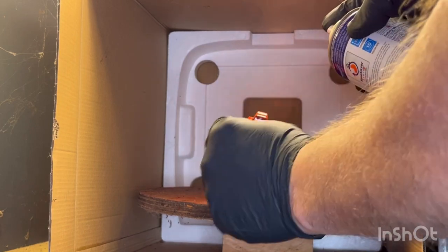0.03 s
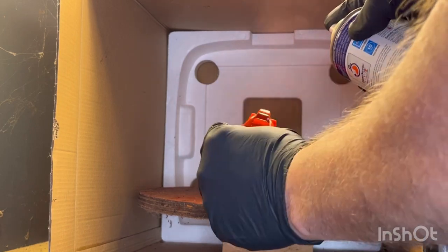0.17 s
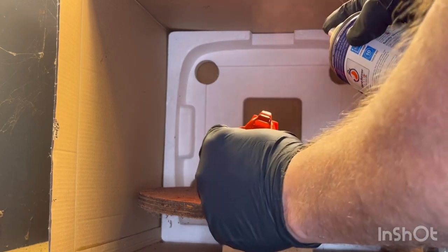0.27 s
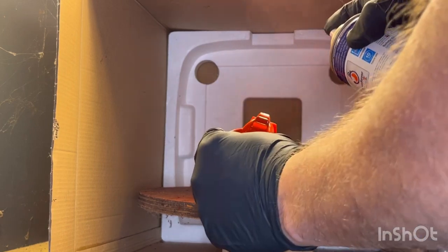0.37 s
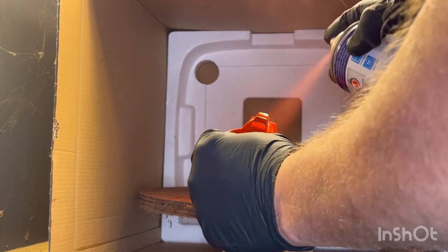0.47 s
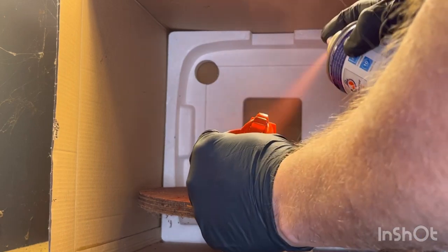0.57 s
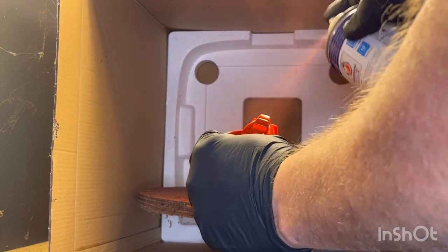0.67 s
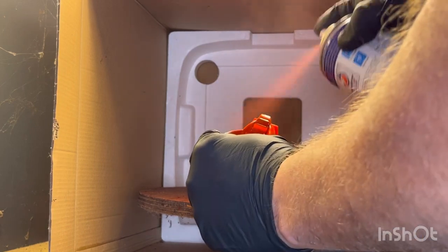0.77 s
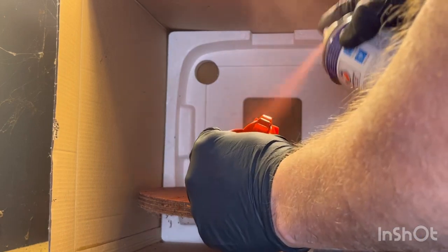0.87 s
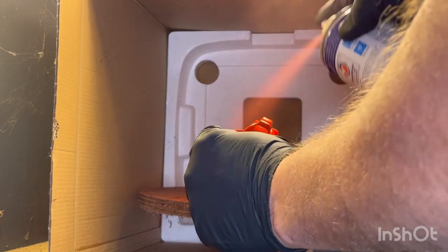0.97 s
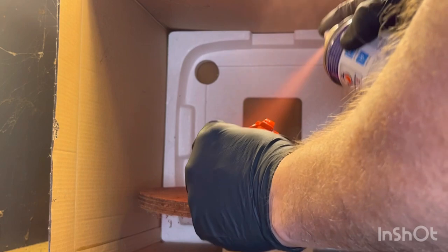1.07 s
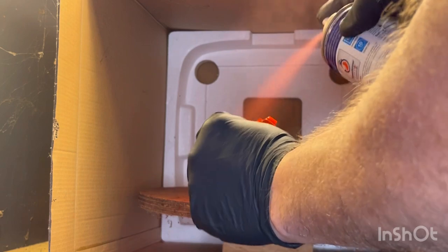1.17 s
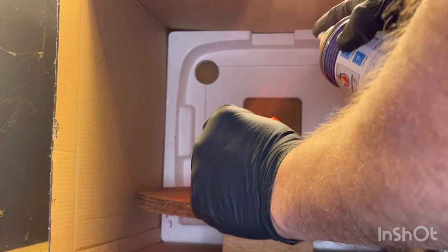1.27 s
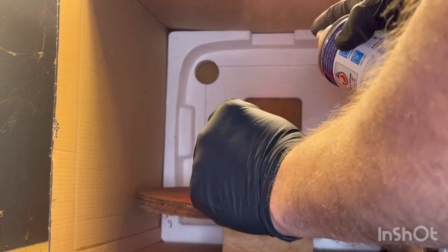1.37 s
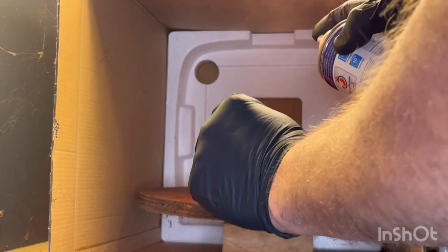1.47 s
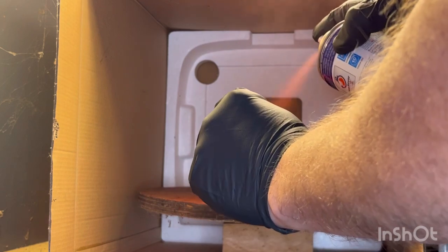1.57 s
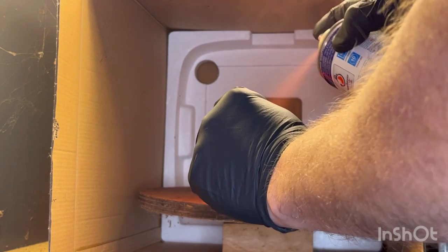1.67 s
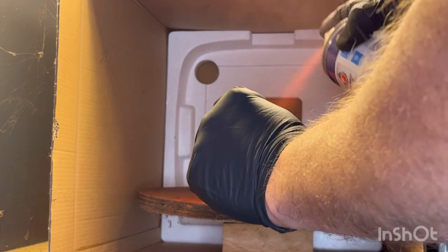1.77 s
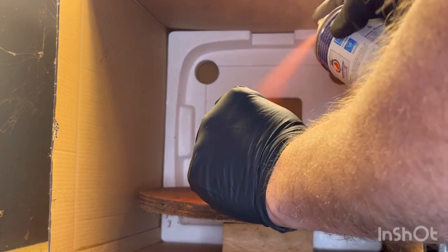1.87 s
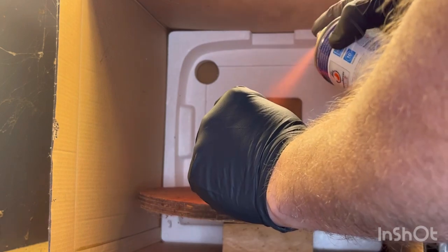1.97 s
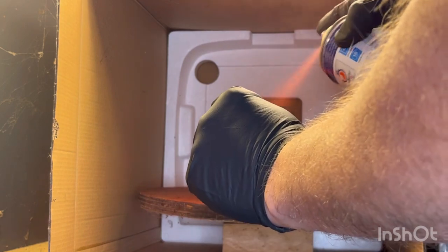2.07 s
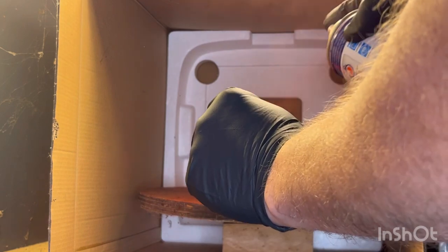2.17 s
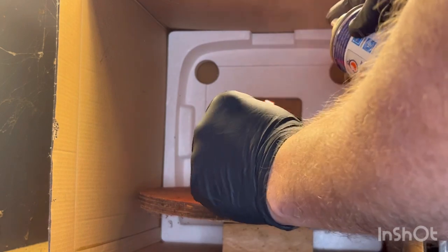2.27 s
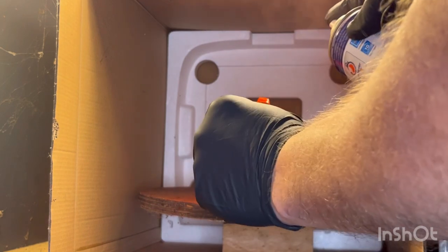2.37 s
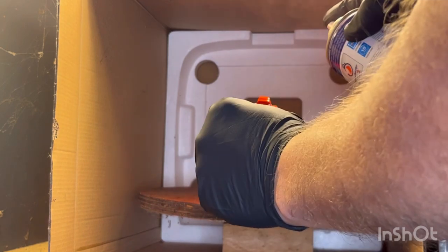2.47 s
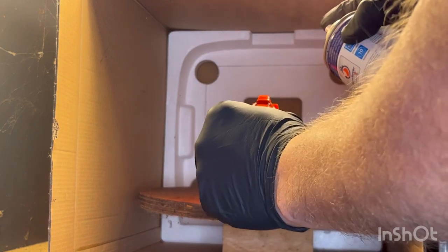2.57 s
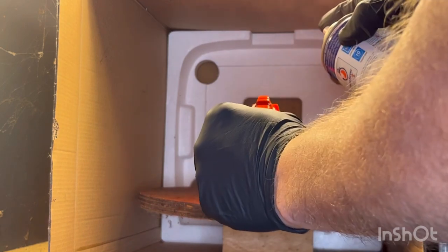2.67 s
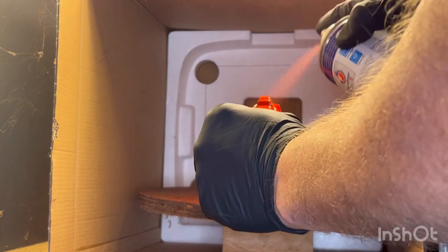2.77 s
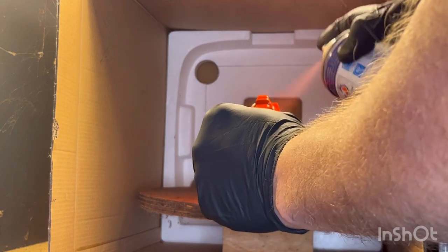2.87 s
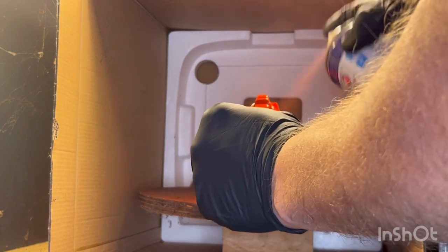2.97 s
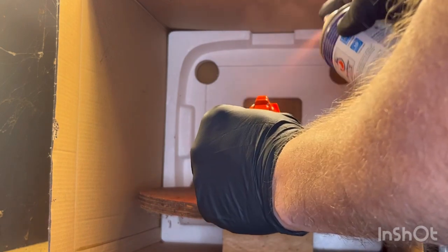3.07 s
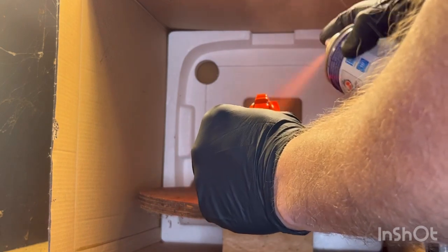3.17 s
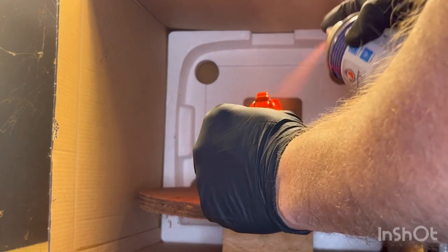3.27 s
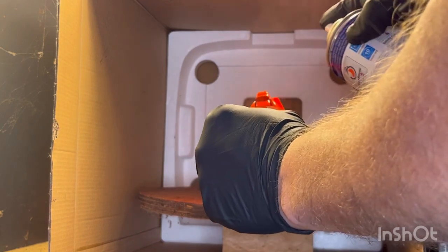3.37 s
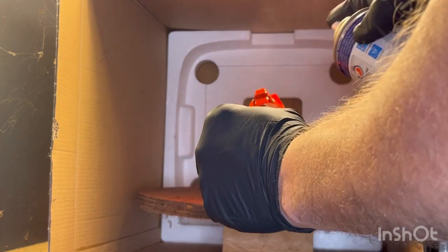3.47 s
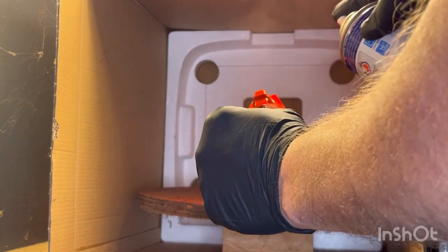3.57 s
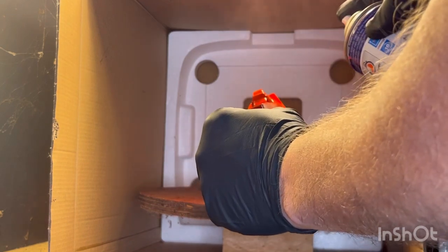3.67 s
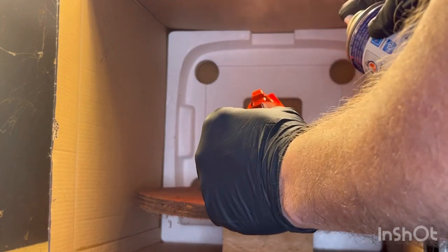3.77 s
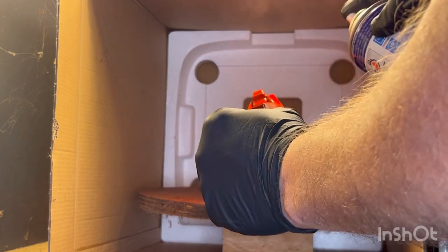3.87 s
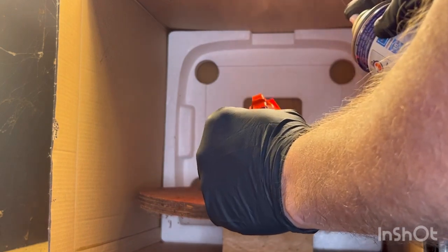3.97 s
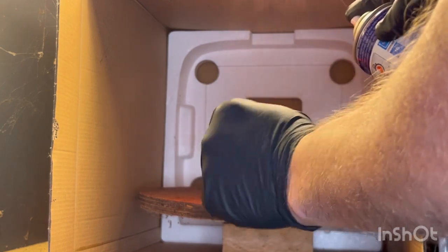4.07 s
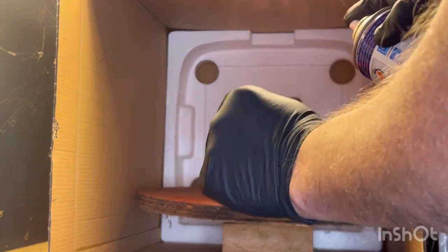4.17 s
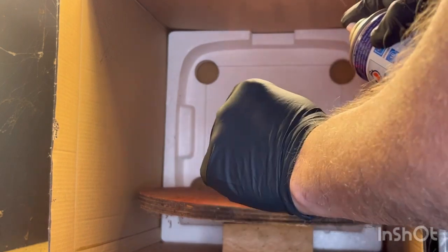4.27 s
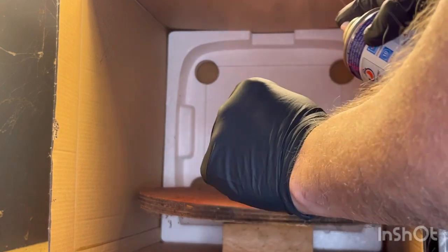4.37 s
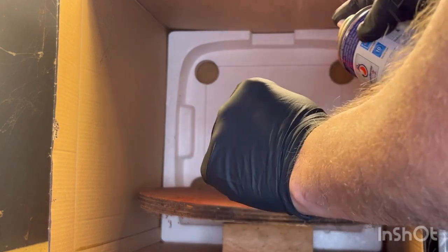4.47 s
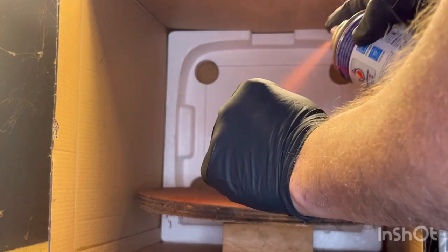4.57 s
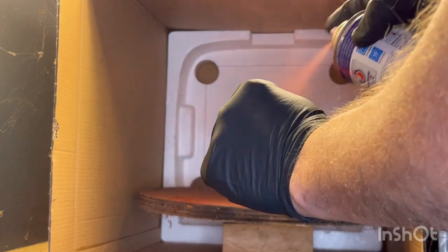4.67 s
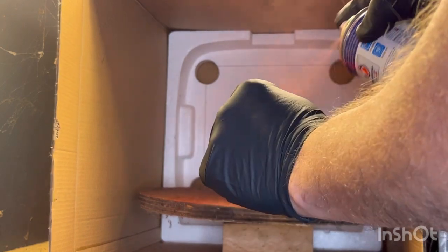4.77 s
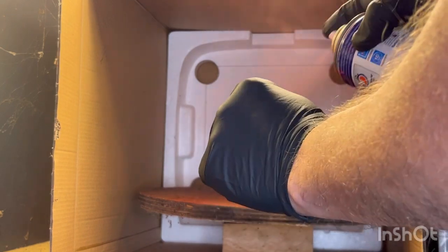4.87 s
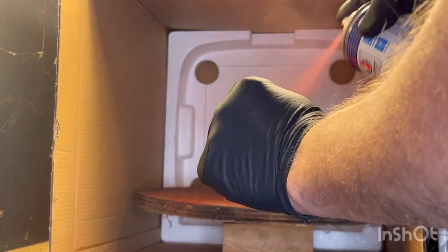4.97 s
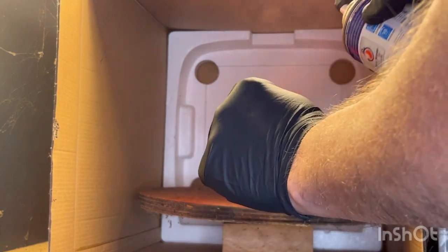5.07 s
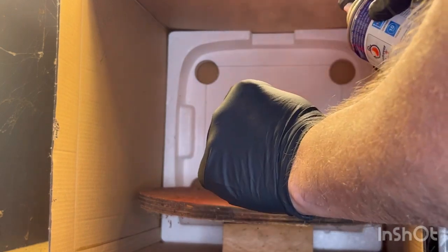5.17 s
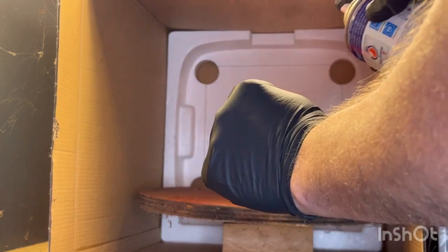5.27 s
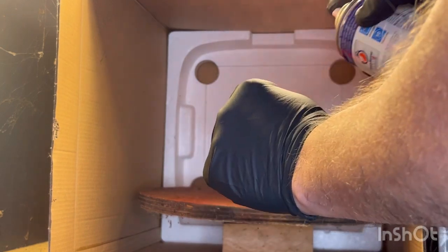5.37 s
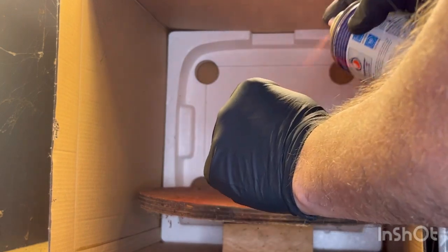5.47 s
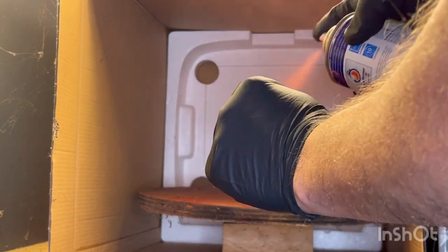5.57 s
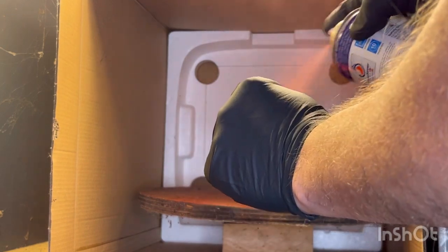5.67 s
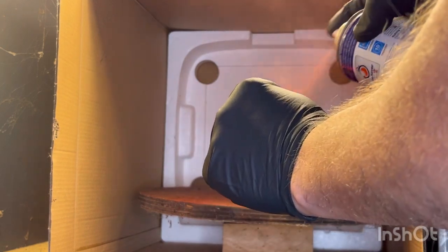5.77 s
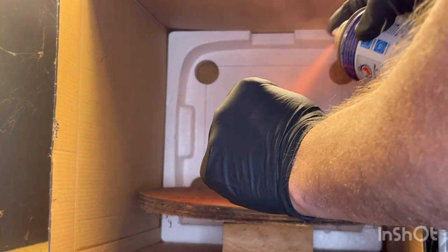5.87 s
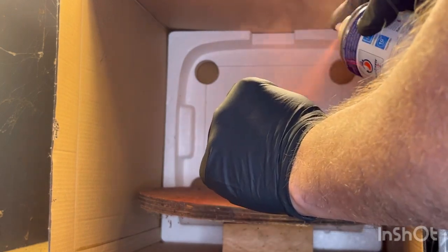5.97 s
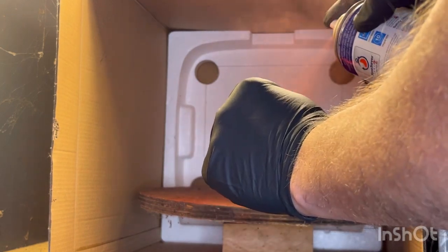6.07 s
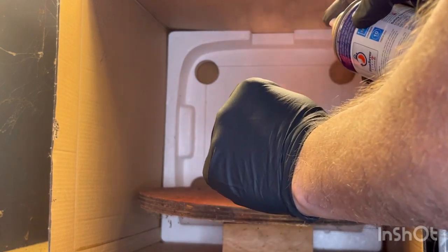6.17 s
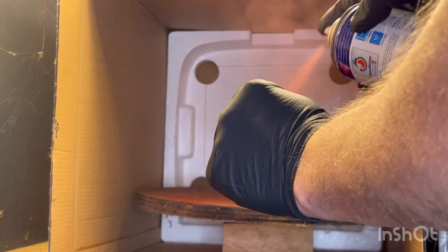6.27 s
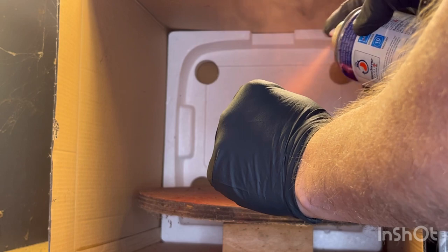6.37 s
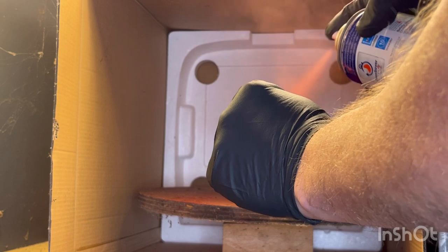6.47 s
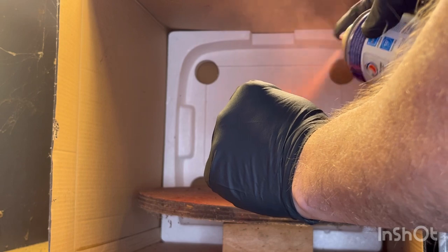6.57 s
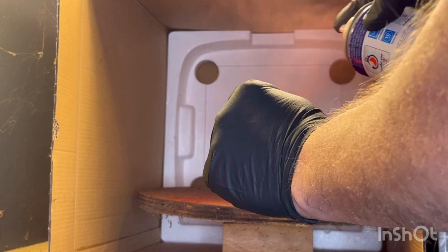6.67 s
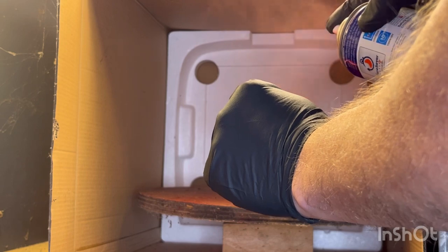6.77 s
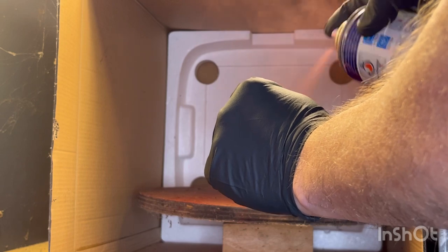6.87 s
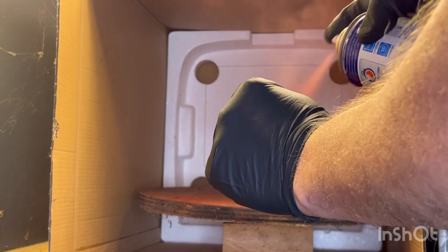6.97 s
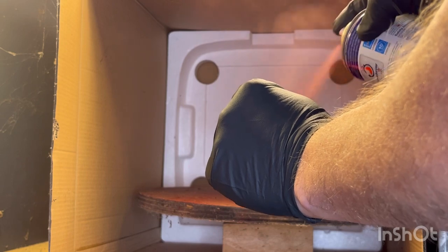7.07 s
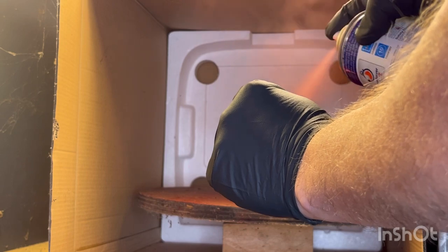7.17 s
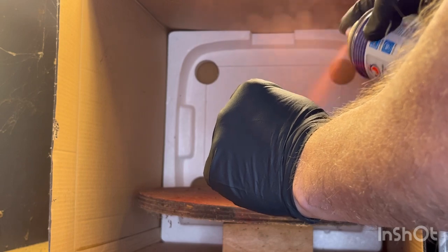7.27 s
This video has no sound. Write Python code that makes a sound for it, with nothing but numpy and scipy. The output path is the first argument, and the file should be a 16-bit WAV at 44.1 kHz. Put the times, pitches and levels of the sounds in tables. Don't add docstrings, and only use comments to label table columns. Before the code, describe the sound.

Quiet low fan rumble with a barely audible thin motor whine opens the scene. From 0.4 s a close aerosol jet fires crisp bursts of roughly a tenth to a third of a second, nearly running together until about 1.25 s. Three more puffs come between 1.5 and 2.1 s, then a pause with a very faint glove swish. Sprays return at 2.8 and 3.1-3.3 s, followed by a longer lull with a short, soft rubber rustle at 3.8 s. A fading burst starts at 4.5 s; around 4.8 s a soft low table bump and a sharp triple metallic ball clack precede a tiny puff at 4.9 s. After another gap, bursts resume from 5.5 s to the end, with clacks near 5.85, a faint one at 6.0, then 6.5, 6.9 and 7.2 s. The hiss is bright, fluttering and lightly boxy, with a short dull room tail.

```python
import sys
import numpy as np
from scipy import signal
from scipy.fft import rfft, irfft
from scipy.io import wavfile
from scipy.ndimage import uniform_filter1d, map_coordinates

SR = 44100
rng = np.random.default_rng(int(sys.argv[2]) if len(sys.argv) > 2 else 0)


def wav_record(signal):
    frames = np.transpose(np.atleast_2d(signal))
    bounded = np.clip(frames, -1, 1)
    quanta = np.round(bounded * 32767).astype(np.int16)
    wavfile.write(sys.argv[1], SR, quanta)


def voltage_ratio(decibels):
    exponent = np.asarray(decibels, float) / 20
    return 10 ** exponent


N = 323246
T = np.arange(N) / SR
HZ = np.fft.rfftfreq(N, 1 / SR)


def along(table, column=1):
    table = np.array(table, float)
    return np.interp(np.log(HZ + 1), np.log(table[:, 0]), table[:, column])


def noise(shape, boost_db=0):
    white = rng.standard_normal((2, N))
    coloured = irfft(rfft(white) * voltage_ratio(along(shape) + boost_db), N)
    return coloured / np.sqrt(np.mean(coloured ** 2))


def walk(rate):
    hold = int(SR / rate)
    steps = np.repeat(rng.standard_normal(N // hold + 1), hold)
    return 1.3 * uniform_filter1d(uniform_filter1d(steps, hold), hold)[:N]


def ring(modes, length_s, detune=0):
    t = np.arange(int(length_s * SR)) / SR
    hz, db, t60 = np.array(modes, float).T[:, :, None]
    decay = np.exp(-np.log(1000) * t / t60)
    return voltage_ratio(db) * np.sin(2 * np.pi * hz * (1 + detune) * t) * decay


def add(out, s, sound):
    i = int(s * SR)
    out[..., i:i + sound.shape[-1]] += sound[..., :N - i]


def spray():
    # f/Hz, level/dB per Hz
    hiss_colour = [(5500, -37.5), (7500, -13.5), (9000, -6), (10500, -5.5), (12500, -5.5), (14000, -7.5),
                   (15000, -12.5), (16000, -8)]
    throat_colour = [(500, -12.5), (900, -11.5), (1500, -11), (2100, -7), (3000, -4.5), (4100, 3),
                     (5500, 2), (7000, -1), (8500, 2), (11000, -23)]
    draught_colour = [(60, -14.5), (130, -3.5), (300, -4.5), (600, -12), (1200, -14)]
    # f/Hz, width/Hz, boost/dB
    box_waves = [(1715, 90, 4), (1990, 60, 4.5), (2162, 75, 7.5), (2400, 270, 5.5), (3087, 54, 8.5),
                 (3995, 56, 2.5), (4370, 69, 3), (5270, 80, -3.5), (7463, 46, 12.5), (10000, 120, 3),
                 (11000, 86, 3), (10700, 55, -10.5), (11120, 87, 2), (12060, 100, -9.5), (12250, 80, 3.5),
                 (12900, 120, 3)]
    box_db = sum(db / (1 + (2 * (HZ - hz) / width) ** 2) for hz, width, db in box_waves)

    flow_db, draught_db = valve()
    throat_db = -51 + 0.5 * (flow_db + 43) + 0.4 * np.minimum(flow_db + 74, 0)
    levels = voltage_ratio([flow_db, throat_db, flow_db + draught_db])
    hiss_gain, throat_gain, draught_gain = uniform_filter1d(levels, size=160)
    lag_s = 0.045
    lag = np.exp(-1 / (lag_s * SR))
    draught_gain = signal.lfilter([1 - lag], [1, -lag], draught_gain)

    hiss_flutter = voltage_ratio(3.5 + 0.8 * walk(25) + 1.0 * walk(60) + 0.83 * walk(900))
    hiss = hiss_gain * hiss_flutter * noise(hiss_colour, box_db)
    throat = throat_gain * voltage_ratio(3.0 + 1.0 * walk(40)) * noise(throat_colour, box_db)
    draught = draught_gain * voltage_ratio(5.5 + 2.0 * walk(15)) * noise(draught_colour)
    return patchy(hiss + throat) + draught


def valve():
    # t/s, length/s, hiss level/dB, sag by the end/dB, draught against hiss/dB
    presses = [(0.406, 0.3, -42.5, 10.5, -19), (0.743, 0.28, -44, -1, -19), (0.862, 0.057, -48, 12, -36),
               (0.943, 0.22, -44.5, 3.5, -24.5), (1.136, 0.12, -43, 4.5, -12.5),
               (1.522, .23, -46.5, 2, -10.5), (1.76, 0.21, -43, 7.5, -14), (1.948, 0.17, -43, 4, -16),
               (2.764, 0.28, -46, 10, -14.5), (3.081, 0.17, -44, 2, -14), (3.255, 0.06, -44.5, -2, -8),
               (4.504, 0.38, -43.5, 20, -12.5), (4.924, 0.084, -43, 9.5, -14),
               (5.487, 0.3, -43, 11.5, -19.5), (5.785, 0.33, -41.5, 13, -17.5),
               (6.221, 0.033, -58.5, -8.5, -7.5), (6.254, .15, -45.5, -4.5, -21.5),
               (6.391, 0.26, -42.5, 5.5, -18.5), (6.878, .22, -44, 2.5, -20), (7.094, 0.25, -42, 7, -16.5)]
    leak_s, leak_db, leak_fade_db = 0.024, -58, -4
    open_s, open_from_db, sag_power = 0.014, -5, 2.6
    shut_db_per_s, dregs_db, dregs_db_per_s = 900, -13, 330

    s, length, db, sag_db, draught_db = np.array(presses, float).T[:, :, None]
    t = T[None] - s
    late = np.maximum(t - length, 0)
    opening = open_from_db * (1 - t / open_s).clip(0, 1)
    sag = sag_db * (t / length).clip(0, 1) ** sag_power
    shut = np.minimum(shut_db_per_s * late, dregs_db_per_s * late - dregs_db)
    flow = db + opening - sag - shut
    leak = np.where(t > -leak_s, leak_db + leak_fade_db * (1 + t / leak_s), -160)
    flow = np.where(t > 0, flow, leak)
    return flow.max(0), draught_db[flow.argmax(0), 0]


def patchy(jet):
    patch_hz, patch_per_s, patch_db = 151.3, 14, 3
    hz, s, bins = signal.stft(jet, SR, nperseg=512)
    patches = rng.standard_normal((int(SR / 2 / 60), int(N / SR * 40)))
    at = np.meshgrid(hz / patch_hz, s * patch_per_s, indexing="ij")
    swell = voltage_ratio(patch_db * map_coordinates(patches, at, order=1))
    return signal.istft(bins * swell, SR, nperseg=512)[1][:, :N]


def ball():
    # t/s, peak level/dB, rolling level/dB
    clacks = [(4.8482, -22, -12), (4.8674, -33.5, -13), (4.8843, -35, -16), (5.8288, -23, -19.5),
              (5.8606, -32, -12), (5.8776, -36.5, -18.5), (5.9788, -42.5, -20.5), (6.5028, -34, -13.5),
              (6.912, -29, -10.5), (7.1654, -25, -7.5), (7.1927, -34.5, -13.5), (7.2092, -36, 0),
              (7.2646, -64, -22)]
    # f/Hz, level/dB, t60/s
    can_modes = np.array([(860, -40, 0.046), (1373, -13.5, 0.15), (1963, -5, 0.028), (2043, -7, 0.032),
                          (2850, -8, 0.016), (3630, -7.5, 0.022), (4005, 5, 0.022), (4240, 1.5, 0.035),
                          (5460, -17.5, .02), (8920, 6, .015), (12000, -12.5, .01)])
    held = can_modes * [1, 1, 0.6]
    dull = voltage_ratio(-2.07 * np.log2(can_modes[:, :1] / 4000).clip(0))
    crack_s, crack_db, roll_s = 0.00037, 3.5, 0.028
    contact_band = signal.butter(1, [2500, 9000], "band", fs=SR)
    low_cut = signal.butter(2, 1000, "high", fs=SR)

    out = np.zeros((2, N))
    for s, db, roll_db in clacks:
        detune, uneven_db = rng.standard_normal((2, len(can_modes), 1)) * [[[0.012]], [[2.0]]]
        modes = ring(held, 0.36, detune) * voltage_ratio(uneven_db) * dull
        t = np.arange(modes.shape[1]) / SR
        contact = signal.lfilter(*contact_band, rng.standard_normal(len(t)))
        crack = voltage_ratio(crack_db) * np.exp(-t / crack_s) * contact
        chatter = np.exp(-t / roll_s) * voltage_ratio(4.6 * rng.standard_normal(len(t)))
        push = voltage_ratio(roll_db - 11.5) * rng.standard_normal((2, len(t))) * chatter
        push[:, :int(0.0035 * SR)] *= voltage_ratio(11.0)
        push[:, 0] = 1
        clack = signal.fftconvolve(push, (modes.sum(0) + crack)[None], axes=1)
        clack = signal.lfilter(*low_cut, clack)
        add(out, s, voltage_ratio(db + 3.0) * clack / np.abs(clack).max())
    return out


def glove():
    # t/s, spread/s, level/dB
    rustles = [
        (2.568, .05, -91),
        (3.80, 0.032, -84),
        (5.15, .04, -91),
    ]
    swell = sum(voltage_ratio(db) * np.exp(-0.5 * ((T - s) / spread) ** 2) for s, spread, db in rustles)
    rubber = noise([(9000, -45.0), (10500, -5), (12000, 4.5), (13800, 0), (14500, -28.5)])
    return swell * voltage_ratio(2.0 * walk(87)) * rubber


def table_bump():
    # f/Hz, level/dB, t60/s
    table_modes = [(56.4, -33, 0.71), (153, -38, 0.16), (298, -36.5, 0.082), (450, -50, .04)]
    push_s = 0.01
    boom = ring(table_modes, 0.5).sum(0)
    t = np.arange(len(boom)) / SR
    out = np.zeros((2, N))
    add(out, 4.765, boom * (1 - np.exp(-t / push_s)))
    return out


def workshop():
    # f/Hz, level/dB per Hz
    rumble_colour = [(12, -45.5), (20, -21.5), (34, -14), (59, -2.5), (111, -13), (186, -27), (210, -22.5),
                     (256, -30), (296, -26.5), (534, -40), (810, -36), (938, -45), (3980, -52), (7000, -60),
                     (9100, -85), (15400, -120)]
    air_colour = [(6000, -18.5), (8000, -16.5), (12500, -15), (13500, -31)]
    rumble = voltage_ratio(-58.5 + 1.2 * walk(3)) * noise(rumble_colour)
    air = voltage_ratio(-91) * noise(air_colour)
    whine_hz = 801 + 2.1 * walk(16)
    whine = voltage_ratio(-84 + 2.0 * walk(16)) * np.sin(2 * np.pi * np.cumsum(whine_hz) / SR)
    return rumble + air + whine


def room(near):
    t60_s, level_db, top_hz = 0.16, -18, 4500
    t = np.arange(int(0.5 * SR)) / SR
    decay = np.exp(-np.log(1000) * t / t60_s) * (t > 0.004)
    tail = rng.standard_normal((2, len(t))) * decay
    tail = signal.lfilter(*signal.butter(1, top_hz, fs=SR), tail)
    tail *= voltage_ratio(level_db) / np.sqrt(np.sum(tail ** 2, axis=1, keepdims=True))
    return signal.fftconvolve(near, tail, axes=1)[:, :N]


def scene():
    near = spray() + ball() + glove()
    return near + room(near) + table_bump() + workshop()


def roll_off(x):
    return signal.sosfilt(signal.butter(12, 15710, fs=SR, output="sos"), x)


def record(dry):
    # f/Hz, angle sharing sum and difference/rad, share of the difference that is true
    # lag/0-1, left minus right/dB
    stereo_image = np.array([(40, .17, 0, .8), (250, 0.52, 0.04, 1.5), (800, 1.05, 0.03, 1),
                      (1460, 1.67, 0.03, -2), (1800, 0.89, 0, -3.5), (2250, .05, 0, -1.5),
                      (5000, 0.059, .8, 1), (5850, 1, .8, 0), (6720, 1.08, .8, -2.5),
                      (7930, 3.07, 0.9, 2.5), (8780, 3.22, .8, 2.5), (11300, 6.2, .8, -1.5),
                      (12700, 6.4, .8, -1), (14740, 9.4, .8, 3.5), (16000, 9.5, .8, -0.5)])
    first, second = rfft(dry)
    angle = np.interp(HZ, stereo_image[:, 0], stereo_image[:, 1])
    lag = np.interp(HZ, stereo_image[:, 0], stereo_image[:, 2])
    mid = np.cos(angle / 2) * first
    side = np.sin(angle / 2) * (-1j * lag * first + np.sqrt(1 - lag ** 2) * second)
    lean = voltage_ratio(along(stereo_image, column=3) / 2)
    mix = irfft([(mid + side) * lean, (mid - side) / lean], N)
    return roll_off(mix)


dry = scene()
out = record(dry)
wav_record(out)
```